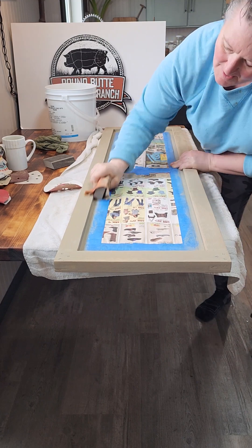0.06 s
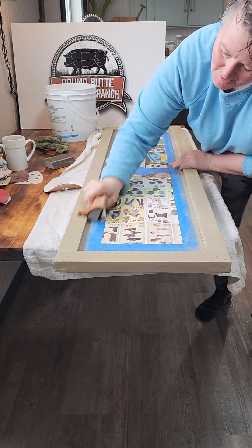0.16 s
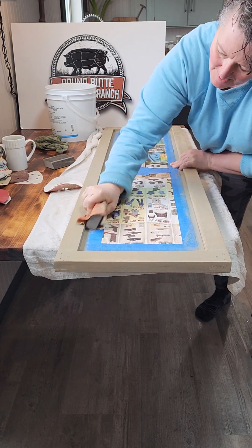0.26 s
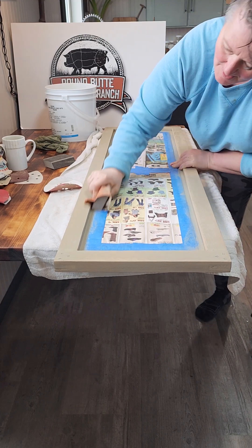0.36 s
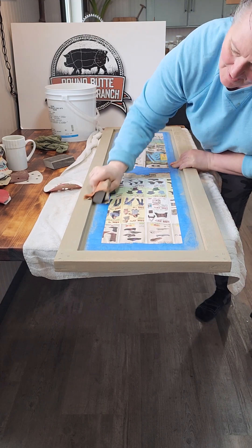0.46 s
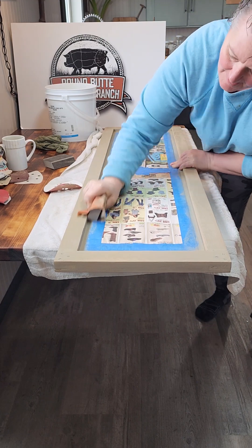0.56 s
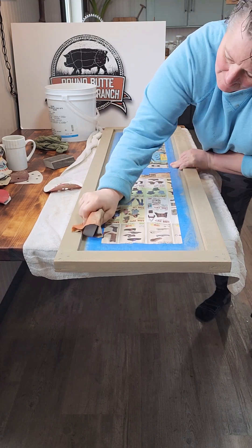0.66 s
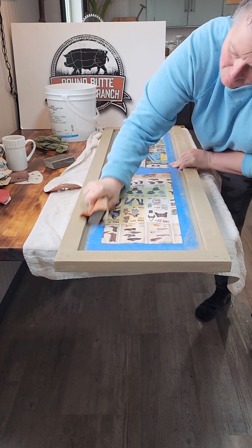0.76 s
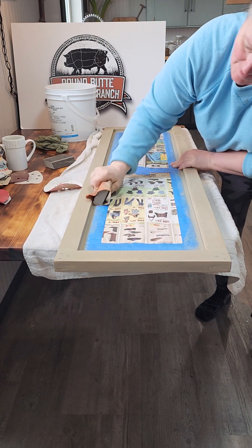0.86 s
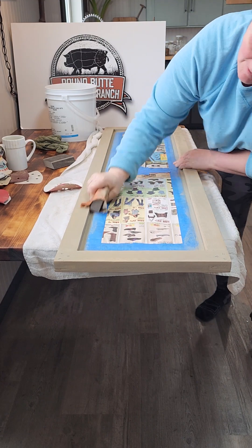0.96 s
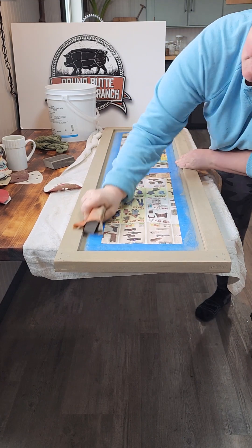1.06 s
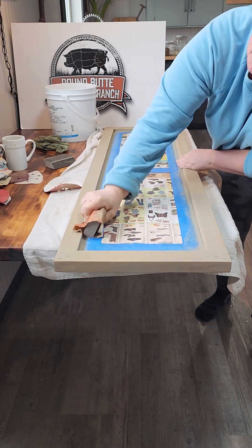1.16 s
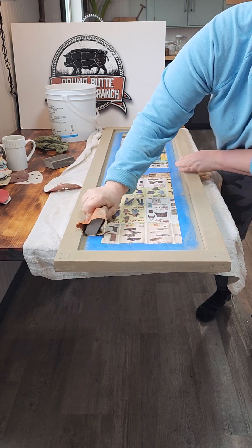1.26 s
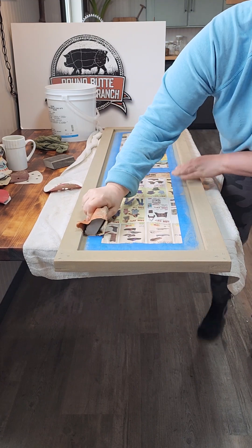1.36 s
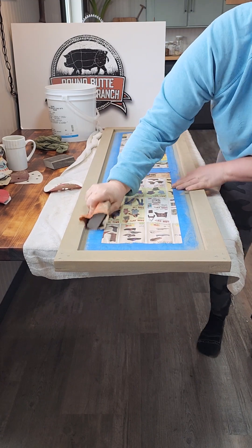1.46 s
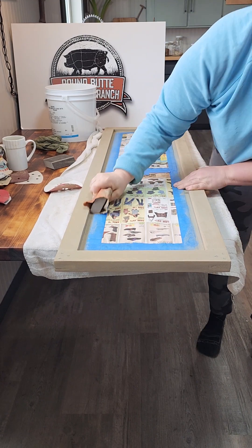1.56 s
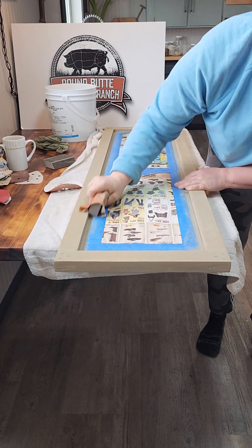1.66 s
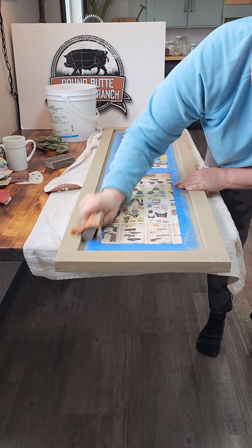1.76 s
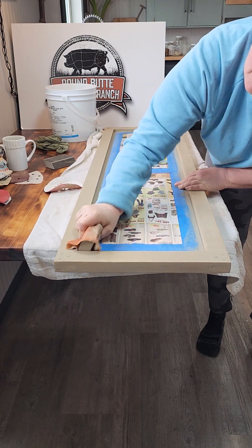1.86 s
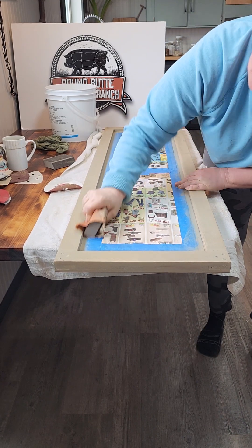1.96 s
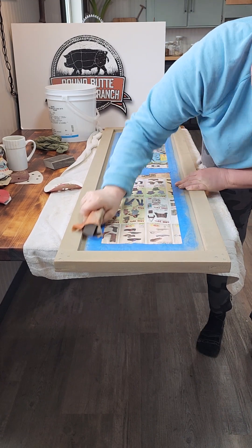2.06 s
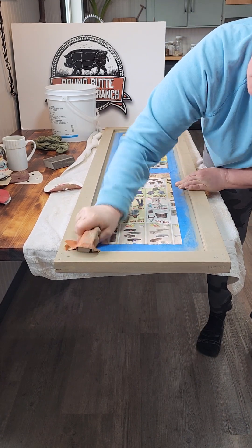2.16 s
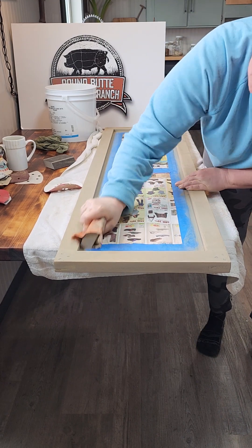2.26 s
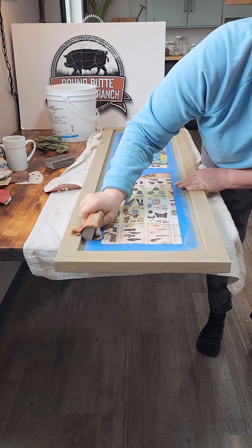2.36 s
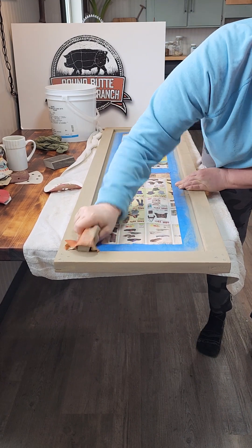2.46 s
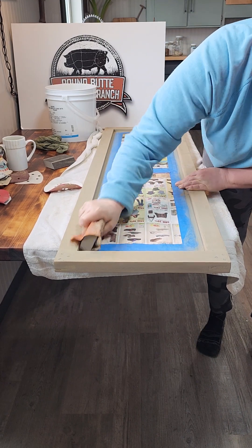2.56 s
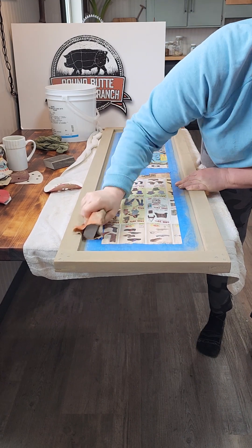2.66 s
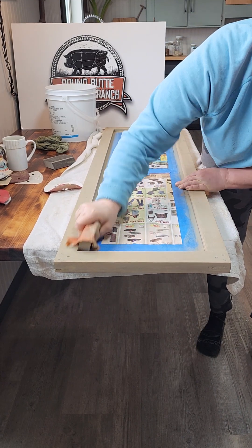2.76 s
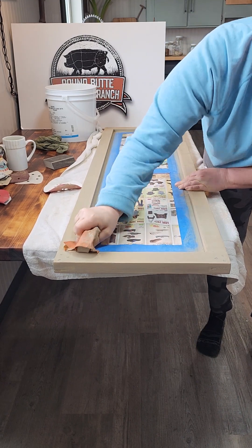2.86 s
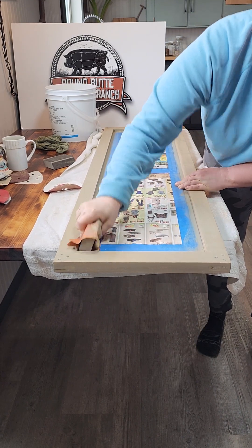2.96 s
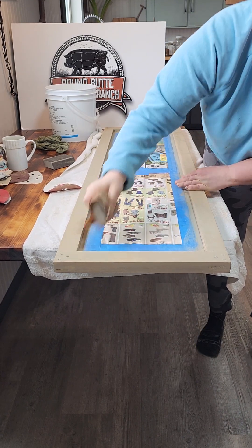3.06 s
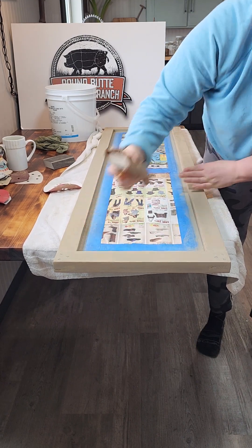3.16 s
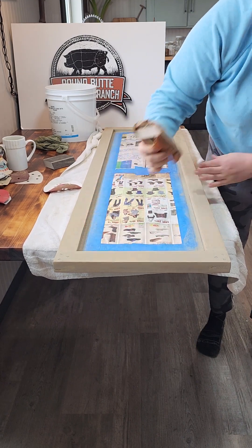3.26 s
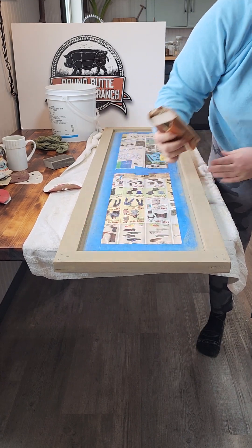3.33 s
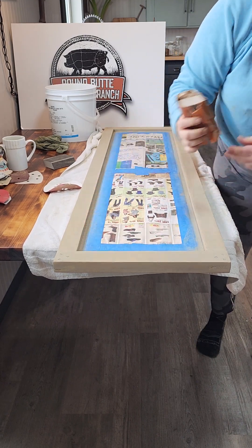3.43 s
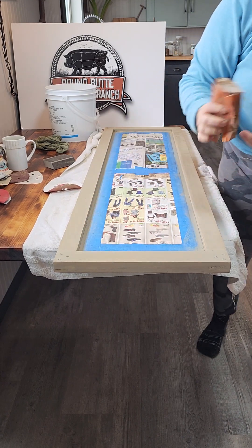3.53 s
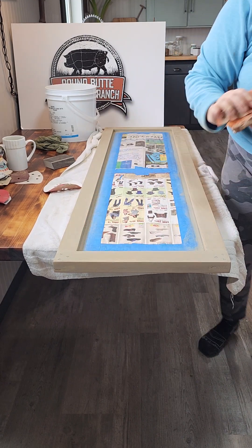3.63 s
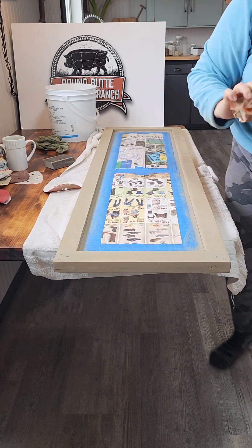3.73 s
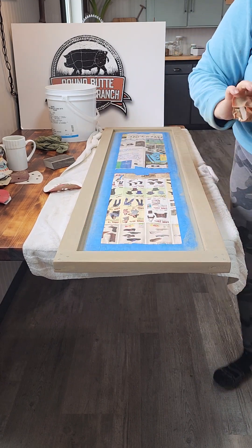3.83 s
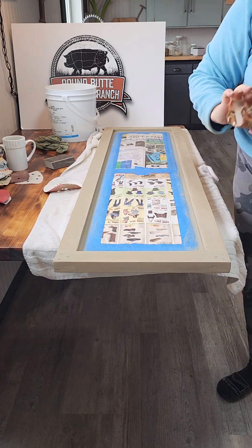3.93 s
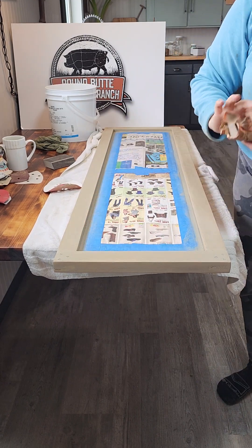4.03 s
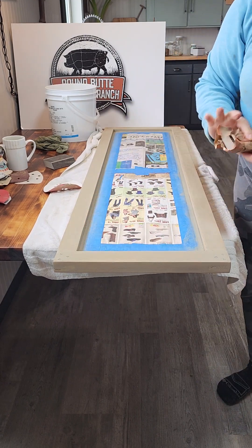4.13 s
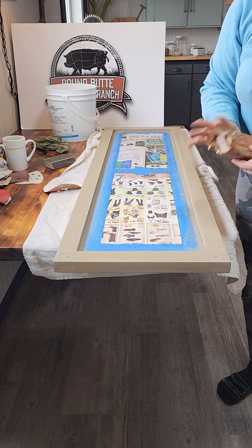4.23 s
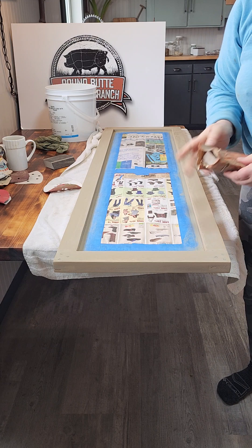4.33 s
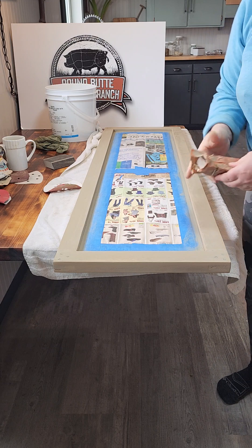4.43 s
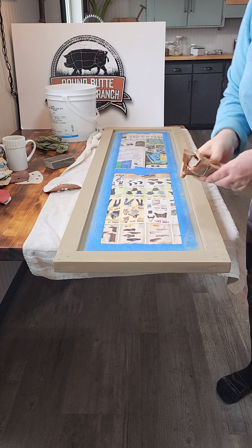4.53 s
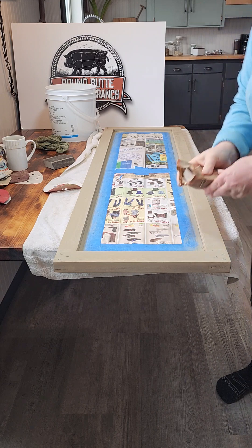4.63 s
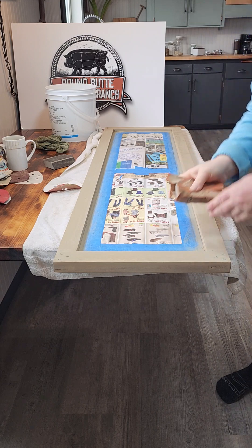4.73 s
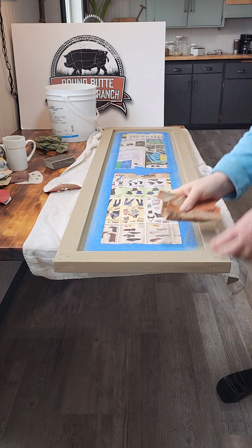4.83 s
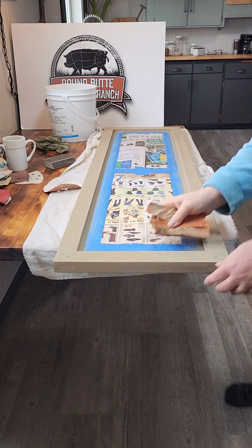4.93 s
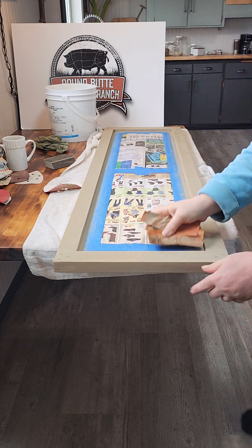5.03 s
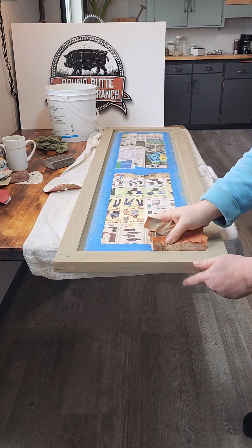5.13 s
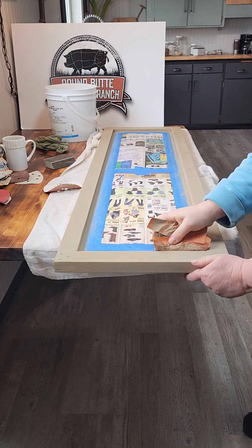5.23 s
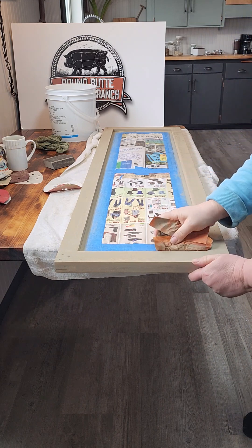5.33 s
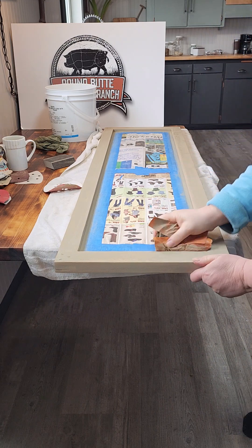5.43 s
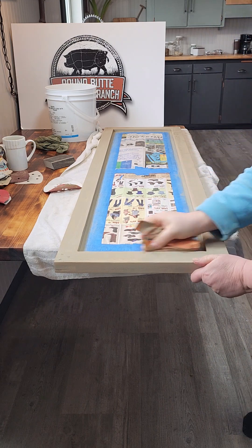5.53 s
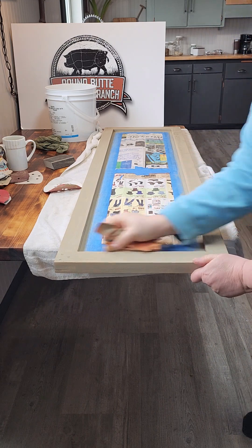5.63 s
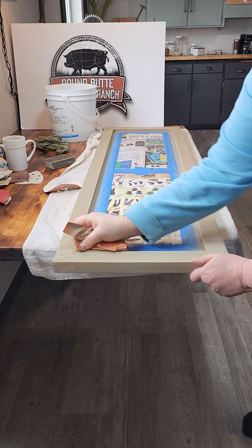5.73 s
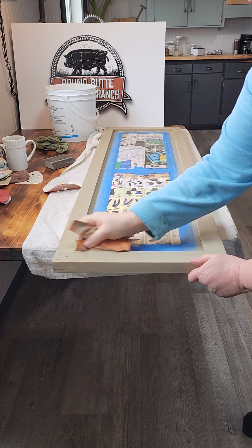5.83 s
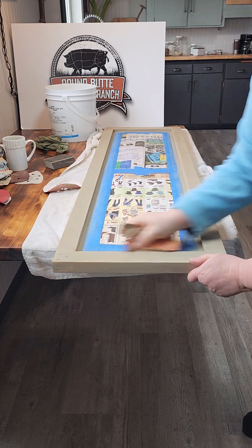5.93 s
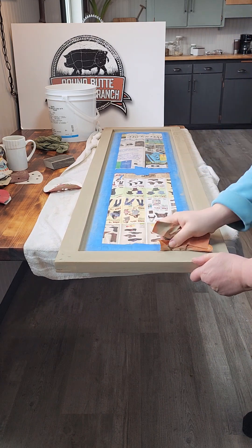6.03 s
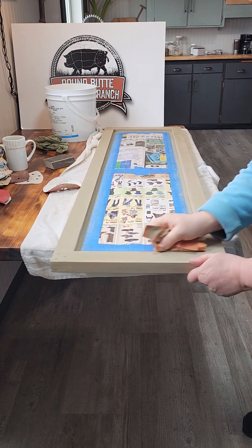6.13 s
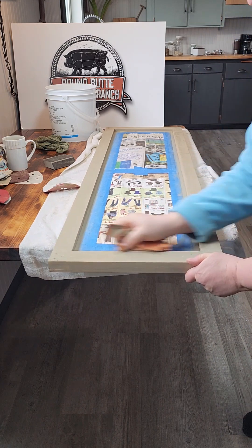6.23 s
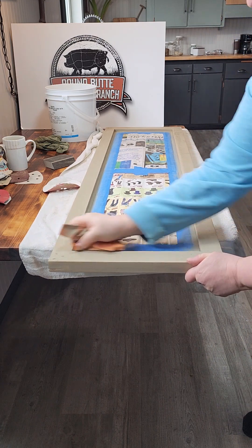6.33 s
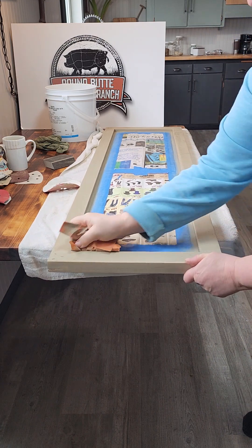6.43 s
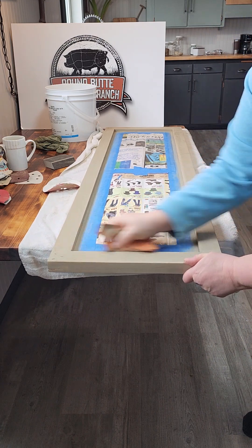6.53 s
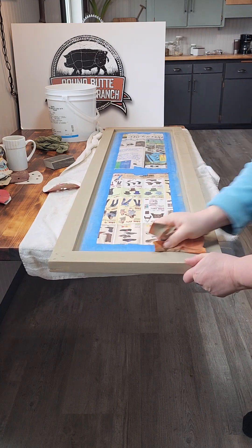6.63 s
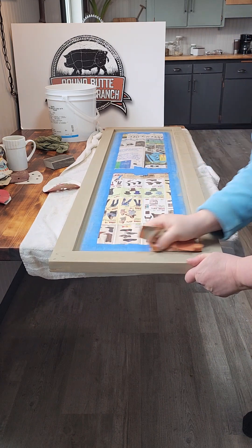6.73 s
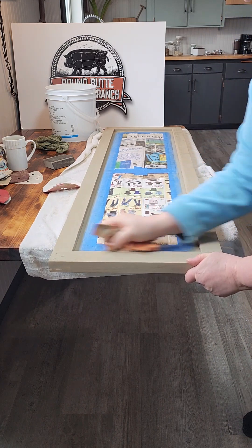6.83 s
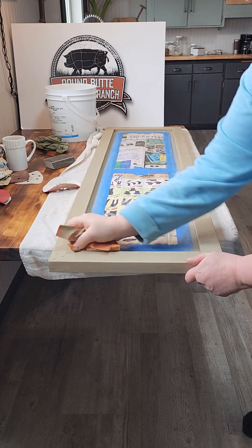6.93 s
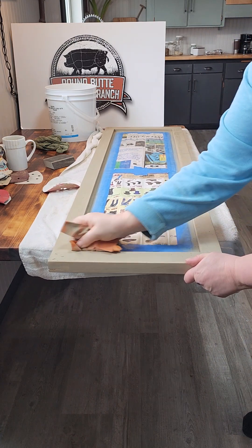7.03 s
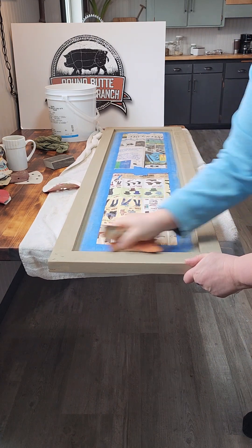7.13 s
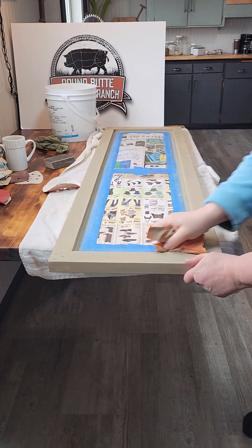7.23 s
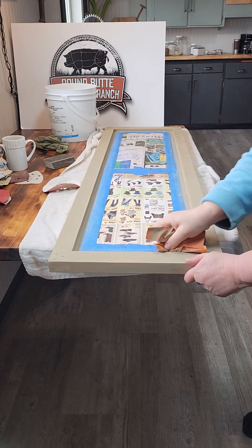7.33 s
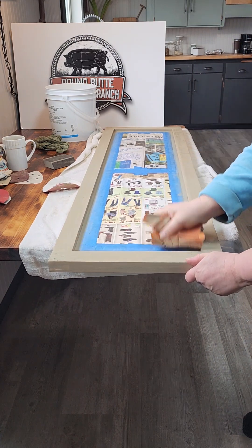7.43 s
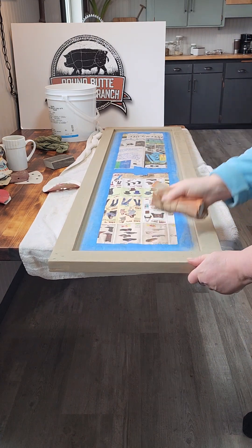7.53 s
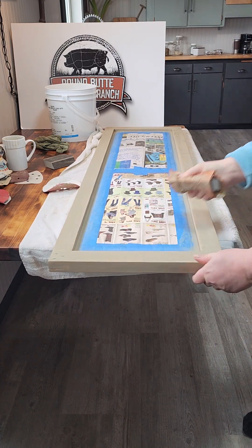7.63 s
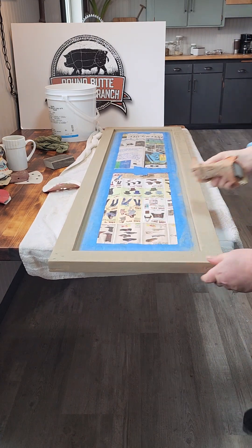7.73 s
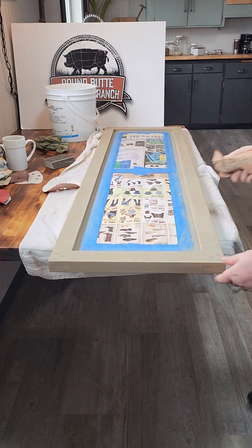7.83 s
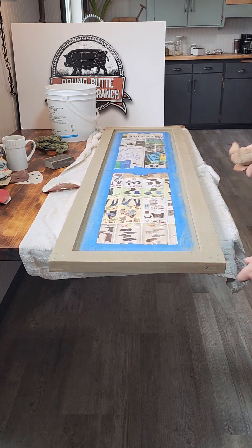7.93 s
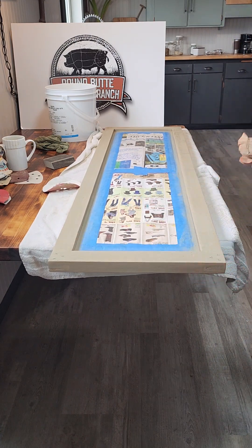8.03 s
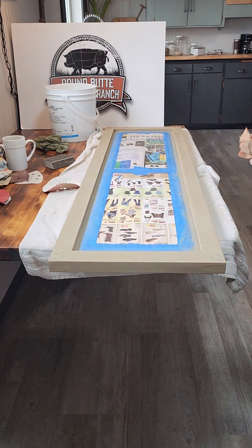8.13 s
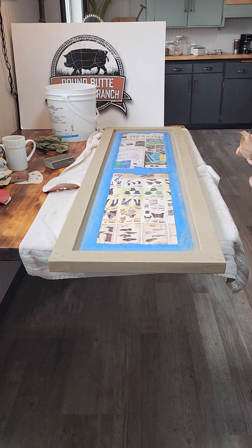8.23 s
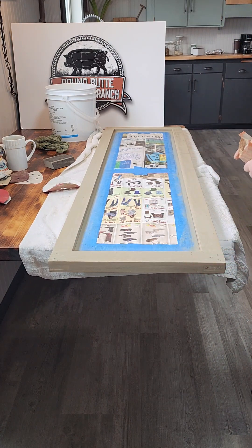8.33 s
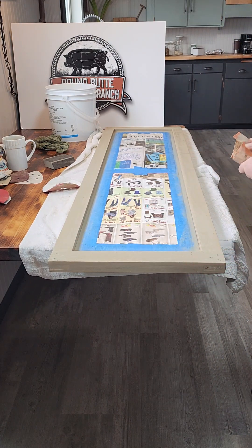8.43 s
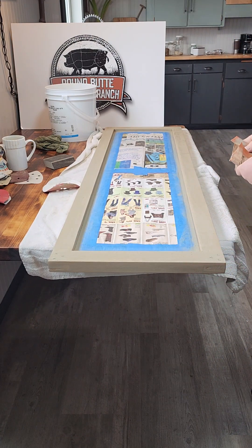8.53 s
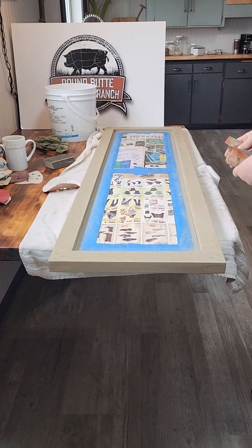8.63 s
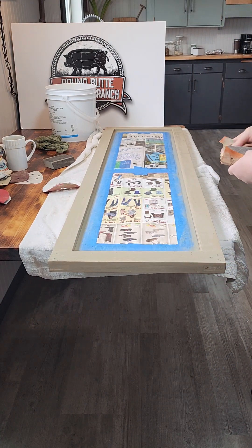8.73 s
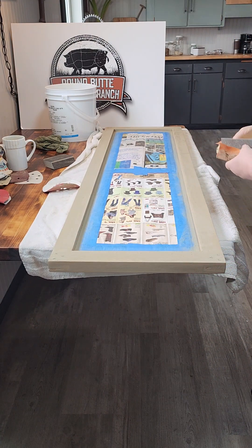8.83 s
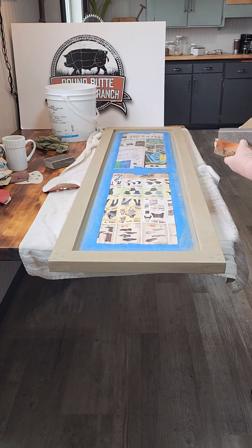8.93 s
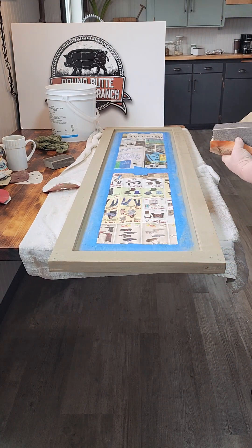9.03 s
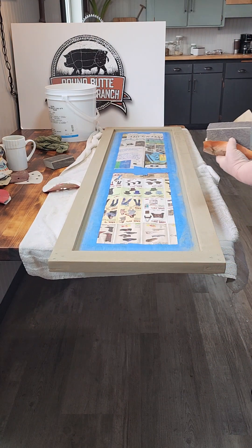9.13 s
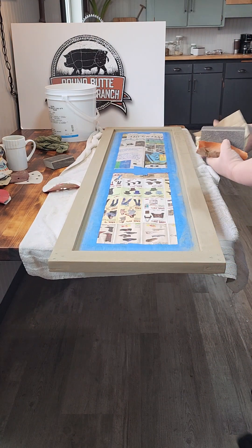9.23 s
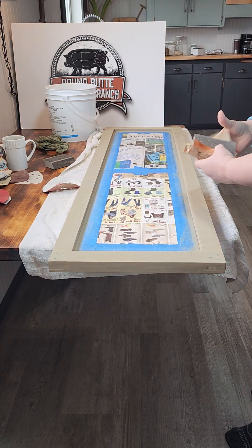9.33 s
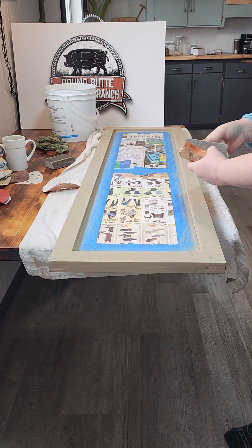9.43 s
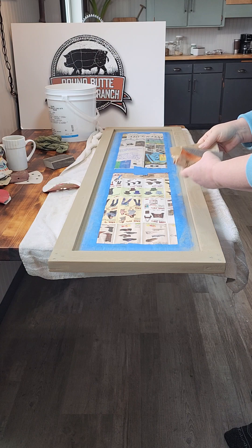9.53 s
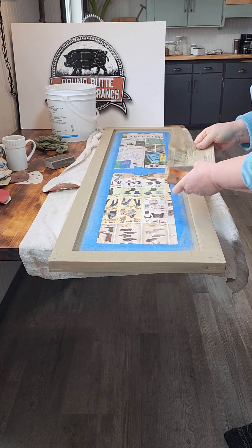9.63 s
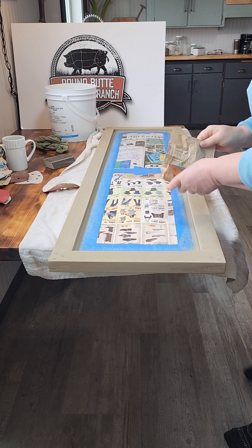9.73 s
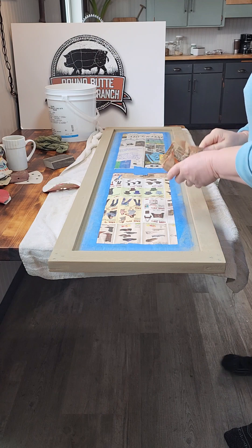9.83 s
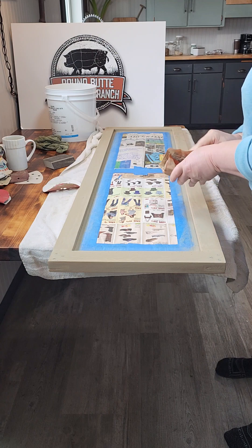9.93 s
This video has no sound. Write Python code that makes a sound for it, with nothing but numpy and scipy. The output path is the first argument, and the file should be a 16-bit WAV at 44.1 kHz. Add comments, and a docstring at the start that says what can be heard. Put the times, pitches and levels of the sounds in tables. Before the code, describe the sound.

Bright, dry gritty scratching swishes in steady strokes, each turn giving a soft wooden knock. After about three seconds it gives way to paper handling, little ticks and muffled steps over faint room noise. Sanding returns for six broader strokes with deeper thumps, then ends in sparse rustles. A small room, heard close in stereo with a short, light reverberation.

```python
"""Sanding a painted door

A sanding block is rubbed back and forth over a painted wooden door on a table, in a quiet room.
Tiny random slips make the grit scratch and the door hiss; ringing wood modes make the knocks and rocking.
In the pauses the hands rustle and tick the paper, feet step softly and the table creaks once.
A small microphone pair close by hears it over room noise, with a faint hum that comes and goes."""
import sys
import numpy as np
from scipy import signal
from scipy.fft import rfft, irfft, next_fast_len
from scipy.io import wavfile
from scipy.ndimage import uniform_filter1d, map_coordinates

SR = 44100
rng = np.random.default_rng(int(sys.argv[2]) if len(sys.argv) > 2 else 0)


def transcribe(signal):
    """Save signal, clipped to [-1, 1], as a 16-bit WAV file at the path in sys.argv[1]."""
    frames = np.atleast_2d(signal).T
    limited = np.clip(frames, -1, 1)
    pcm = np.round(limited * 32767).astype(np.int16)
    wavfile.write(sys.argv[1], SR, pcm)


N = 440559


def amp(db):
    """Turns decibels into a plain factor."""
    return 10 ** (np.asarray(db) / 20)


def unit(x):
    """Scales a sound to an average (RMS) strength of 1."""
    return x / np.sqrt(np.mean(x ** 2) + 1e-20)


def seconds():
    """The time of every sample."""
    return np.arange(N) / SR


def along(points, hz):
    """Reads a curve of (Hz, value) points on a log frequency axis."""
    f, v = np.transpose(points)
    return np.interp(np.log(hz + 1), np.log(f + 1), v)


def curves(rows):
    """Gives one value per sample for each column after the time."""
    s, *columns = np.transpose(rows)
    return [np.interp(seconds(), s, column) for column in columns]


def wobble(rate):
    """A smooth random curve with this many random points a second."""
    points = rng.standard_normal(int(N * rate / SR) + 4)
    return map_coordinates(points, [np.arange(N) * rate / SR])


def filtered(x, response):
    """Changes the strength and timing of each frequency in x by a response."""
    m = next_fast_len(N + SR // 2)
    return irfft(rfft(x, m) * response(np.fft.rfftfreq(m, 1 / SR)), m)[..., :N]


def scratches(per_s, spread_db, patchy_db):
    """Two streams of tiny slips of uneven size, with patches of louder and softer colour."""
    happens = rng.random((2, N)) < per_s / SR
    slips = happens * rng.standard_normal((2, N)) * amp(spread_db * rng.exponential(size=(2, N)))
    z = signal.stft(slips, nperseg=256)[2]
    # smooth the random patches over frequency, then over time
    over_frequency = uniform_filter1d(rng.standard_normal(z.shape[1:]), 4, 0)
    patches = uniform_filter1d(over_frequency, 12, 1)
    return signal.istft(z * amp(patchy_db * unit(patches)), nperseg=256)[1][:, :N]


# How a near sound leans to one side.
# Each row: frequency in Hz, left over right in dB.
LEAN_TO_LEFT = [(60, 2), (130, -3), (290, -13), (640, 3.5), (1410, 0), (3100, -1), (6820, -5), (15000, 3)]


def heard(pair, spectrum, alike, lead=None):
    """Colours two streams and mixes them to left and right; a near source leans and leads by frequency."""
    def turn(hz):
        return np.arccos(np.clip(along(alike, hz), -1, 1)) / 2

    def mid_and_side(hz):
        return amp(along(spectrum, hz)) * [np.cos(turn(hz)), np.sin(turn(hz))]

    def half(hz):
        # each ear gets half of the lean and half of the lead
        return amp(along(LEAN_TO_LEFT, hz) / 2) * np.exp(.5j * lead(hz))

    mid, side = filtered(pair, mid_and_side)
    both = np.array([mid + side, mid - side])
    if lead:
        both = filtered(both, lambda hz: [half(hz), 1 / half(hz)])
    return unit(both)


def modes(table):
    """Adds up (Hz, width in Hz, dB) resonances: each answers most near its own pitch."""
    def response(f):
        total = 0
        for k, (center, width, db) in enumerate(table):
            peak = 1j * f * width / (center * center - f * f + 1j * f * width)
            total = total + (-1) ** k * amp(db) * peak  # signs alternate
        return total
    return response


# The ways the table legs (below 100 Hz), table top (100-400 Hz) and door (above 400 Hz) like to ring.
# Each row: pitch in Hz, relative level in dB, seconds to fade by 60 dB (before any damping).
WOOD_MODES = [ (27, -12.5, 0.068), (38.2, 2.5, 0.41), (46.65, 1, .3), (61.6, -4.5, .22), (77.3, -4.5, .2),
              (160, -7, .09), (192, -1, .22), (222, -3, .06), (245, -2.5, .07), (313, -10, .1),
              (530, -8, 0.027), (644, -11, 0.059), (799, 2, 0.048), (1005, -5, 0.084), (1295, -1.5, 0.057),
              (1769, -6, 0.078), (2057, -10, 0.1), (2880, -5.5, 0.029), ]


def wood_modes(low_hz, high_hz):
    """The wood's modes within a range: the faster one fades, the wider its resonance."""
    return modes([(hz, np.log(1000) / (np.pi * t60), db) for hz, db, t60 in WOOD_MODES if low_hz < hz < high_hz])


# The colour of the room noise.
# Each row: frequency in Hz, relative level in dB per Hz.
AIR_COLOUR = [(18, -39.5), (30, -8.5), (70, -1), (486, -21.5), (721, -21), (3060, -18.5), (3490, -22),
              (6380, -11), (9710, -27.5), (14000, -26.5), (16000, -43.5)]
# The hum comes and goes.
# Each row: time in seconds, hum level in dB.
HUM_LEVEL = [(2.9, -84.5), (3.3, -57), (3.53, -77), (3.74, -63.5), (4.25, -67.5), (4.4, -77), (4.75, -70),
             (5.1, -88)]


def background():
    """Coloured noise fills the room; a low sine with a slightly drifting phase hums."""
    hum = amp(curves(HUM_LEVEL)[0]) * np.sin(2 * np.pi * 150.5 * seconds() + .3 * wobble(3.5))
    alike = [(60, 0.8), (300, .6), (900, 0.097)]  # Hz, left-right likeness
    return amp(-68.0) * heard(rng.standard_normal((2, N)), AIR_COLOUR, alike) + hum


# How long the room rings.
# Each row: frequency in Hz, seconds to fade by 60 dB.
ROOM_FADE = [(200, 0.57), (2000, 0.25), (10000, 0.23)]


def room(x):
    """Each frequency of the room's answer dies at its own speed."""
    hz, t, z = signal.stft(rng.standard_normal((2, SR // 2)), SR, nperseg=256)
    fading = z * amp(-60 * t / along(ROOM_FADE, hz)[:, None])
    tail = signal.istft(fading, SR, nperseg=256)[1]
    late = np.pad(tail, ((0, 0), (300, N - 300 - tail.shape[1])))  # 300 samples late
    # the answer is weak below about 600 Hz
    tail = filtered(late, lambda f: f * f / (f * f + 600 ** 2))[:, :SR // 2]
    return signal.fftconvolve(x, tail / np.linalg.norm(tail[0]), axes=1)[:, :N]


# Soft footfalls.
# Each row: start in seconds, level in dB.
FOOTFALLS = [(4.264, -39), (4.826, -28.5), (4.939, -38)]


def steps():
    """A foot in a sock makes the floorboards boom once: a low sine swells fast and fades."""
    out = np.zeros(N)
    for start, db in FOOTFALLS:
        since = np.clip(seconds() - start, 0, None)
        swell = 1 - np.exp(-since / 0.0097)
        out += amp(db - 60 * since / 0.25) * swell * np.sin(2 * np.pi * 79.0 * since)
    return out


def creak():
    """One short low creak as the weight leaves the table."""
    t = seconds()
    return amp(-57) * np.exp(-((t - 3.4) / 0.016) ** 4) * np.sin(2 * np.pi * 328 * t)


# How hard the table is pushed about.
# Each row: time in seconds, level of the legs in dB, level of the table top in dB.
TABLE_ROCKING = [(0, -45, -46), (.37, -39.5, -52.5), (.67, -47, -56.5), (1.25, -45, -52), (1.5, -53, -64),
                 (1.62, -48.5, -57), (2.24, -43, -53.5), (3.05, -41.5, -54.5), (3.4, -61, -77.5),
                 (4.2, -65.5, -77.5), (5, -69.5, -68), (5.55, -57.5, -64), (5.98, -43.5, -59.5),
                 (7.31, -39, -56.5), (7.67, -55.5, -78), (8.4, -71, -80), (8.55, -79, -80),
                 (9.99, -72, -69.5)]


def table():
    """Uneven pushes keep the table legs and top moving between jolts."""
    legs_db, top_db = curves(TABLE_ROCKING)
    uneven_db = np.array([[4.5 * wobble(9)], [5.6 * wobble(16)]])  # legs, top
    pushes = rng.standard_normal((2, 2, N)) * amp(uneven_db)
    legs = unit(filtered(pushes[0], wood_modes(10, 100)))
    top = unit(filtered(pushes[1], wood_modes(100, 400)))
    mid, side = amp(legs_db) * legs + amp(top_db) * top
    return mid + amp(-19.5) * np.array([side, -side])


# The colour of sliding and snapping paper.
# Each row: frequency in Hz, relative level in dB per Hz.
PAPER_COLOUR = [(1180, -27), (2000, -5), (2320, -10.5), (2810, -10), (3770, 0.5), (4860, -0.5), (5350, -2),
                (6310, 1.5), (9660, -12), (11600, -3.5), (12400, -4.5), (15200, -9), (16000, -24.5)]
# Paper snaps and touches.
# Each row: start in seconds, level at the start in dB, seconds to fade by 60 dB.
PAPER_TICKS = [(0.267, -14.5, 0.01), (1.52, -43, 0.012), (4.9296, -44, 0.026), (5.201, -40.5, .06),
               (5.3567, -39, 0.015), (5.453, -47, 0.013), (5.527, -45, .05), (7.823, -50, 0.024),
               (8.285, -48, .08), (8.7552, -37.5, 0.028)]


def ticks():
    """Paper snaps and touches are short bursts of noise with a sudden start."""
    t, shape = seconds(), np.zeros(N)
    for start, db, t60 in PAPER_TICKS:
        shape += amp(db - 60 * np.abs(t - start) / t60) * (t >= start)
    return shape * heard(rng.standard_normal((2, N)), PAPER_COLOUR, SANDING_ALIKE)


# The colour of the low rub under the rustle.
# Each row: frequency in Hz, relative level in dB per Hz.
RUB_COLOUR = [(240, -33.5), (400, -20.5), (563, -6), (663, -11), (780, 1.5), (1170, -7), (1510, -0.5),
              (1770, -4.5), (2800, -5.5), (3640, -24), (6160, -120)]
# The hands fold and shift the paper.
# Each row: start of the hold in seconds, hold in seconds, rustle in dB, low rub in dB over the rustle.
PAPER_RUSTLES = [(1.371, .01, -48, 2), (3.164, 0.061, -50, -27), (3.292, 0.045, -51, -15),
                 (3.485, 0.0053, -60, -17), (3.72, .005, -60.5, -13), (3.792, .06, -63.5, -16),
                 (3.969, .03, -55, -29), (4.066, .005, -45, -9), (4.138, .005, -45, -7),
                 (4.235, 0.081, -48, -4), (4.279, 0.083, -42.5, -10.5), (4.555, .005, -60.5, -5),
                 (4.619, 0.0055, -52, -13), (4.685, .005, -49, -7), (4.738, 0.032, -49.5, -9.5),
                 (4.947, 0.0046, -53, -6), (4.991, .005, -50.5, -12), (5.05, 0.11, -54.5, -21),
                 (5.21, 0.0042, -47.5, -1), (5.26, .005, -40, 0), (5.303, 0.076, -48.5, 1.5),
                 (7.423, 0.0042, -40, -7), (7.511, 0.044, -40.5, -4.5), (7.914, .005, -59, -24),
                 (8.3, .03, -51.5, -8), (8.455, .01, -49, -3.5), (8.54, 0.031, -52.5, -2.5),
                 (8.681, 0.1, -50.5, -2.5), (8.977, 0.0053, -54, -16), (9.297, 0.0041, -56, -9),
                 (9.405, 0.0045, -56.5, -11), (9.6, .005, -56.5, 2), (9.68, 0.022, -51, -4),
                 (9.742, 0.029, -55, 0.5), (9.985, .005, -57, -1)]
# The faint stir of paper held in the hand.
# Each row: time in seconds, middle level in dB, around which it wobbles.
HELD_PAPER = [(1.4, -57), (1.5, -56), (3.25, -55), (3.39, -65), (3.58, -76.5), (3.66, -67), (3.9, -74),
              (4.2, -56.5), (4.5, -64.5), (4.82, -62.5), (5.45, -54.5), (7.66, -51), (7.81, -66),
              (8.4, -64.5), (8.83, -61.5), (8.92, -66.5), (9.5, -60.5), (9.87, -68.5)]
RISE_DB_PER_S, FALL_DB_PER_S = 450, 282  # every rustle comes faster than it goes
HELD_RUB_DB = -6.5  # over the held rustle
HELD_UNEVEN_DB, HELD_STIRS_PER_S = 1.5, 25
HANDS_LEAD_S = 6 / 44100  # the left side hears the hands this much earlier


def hands():
    """Fingers slide over the paper, off to one side: uneven slips that reach the left first."""
    t = seconds()
    rustle = amp(curves(HELD_PAPER)[0] + HELD_UNEVEN_DB * wobble(HELD_STIRS_PER_S))
    rub = amp(HELD_RUB_DB) * rustle
    for start, hold, db, rub_db in PAPER_RUSTLES:
        rise_db = RISE_DB_PER_S * np.clip(start - t, 0, None)
        fall_db = FALL_DB_PER_S * np.clip(t - start - hold, 0, None)
        swell = amp(db - rise_db - fall_db)
        rustle, rub = np.hypot(rustle, swell), np.hypot(rub, amp(rub_db) * swell)
    slips = scratches(per_s=12000, spread_db=-1.0, patchy_db=1.3) * amp(1.5 * wobble(60))
    ring = modes([(570, 60, -4), (800, 70, 0), (1300, 120, 0), (2100, 300, -2)])
    ringing = filtered(slips, lambda f: 1 + 0.5 * ring(f))
    alike = [(300, 0.53), (1000, 0.18), (10000, 0.37)]  # Hz, left-right likeness
    lead = lambda hz: 2 * np.pi * hz * HANDS_LEAD_S
    return rustle * heard(slips, PAPER_COLOUR, alike, lead) + rub * heard(ringing, RUB_COLOUR, alike, lead)


# The block and hands jolt the wood.
# Each row: start in seconds, boom in dB, thud in dB over the boom, rap in dB over the boom.
WOOD_KNOCKS = [(0.202, -27.5, -33, -12), (0.266, -32, 15.5, 14), (0.279, -24, 11.5, 2.5),
               (0.625, -28, -37, -14), (0.817, -33.5, -1, -14), (1.081, -31, -27, -11.5),
               (1.262, -33, -4, -11.5), (2.004, -23.5, -3, -20.5), (2.299, -28.5, 0, -11),
               (2.348, -22, -14, -31), (2.551, -27.5, -15, -21.5), (2.648, -25.5, -14, -24.5),
               (2.851, -35, -10, -9), (2.937, -26, -10, -15), (3, -23.5, -15, -32),
               (4.218, -44.5, 3.5, -16), (4.823, -33, -10, -33), (4.93, -38.5, 2.5, -2.5),
               (5.203, -37.5, -10, -5.5), (5.855, -27.5, -9.5, -16), (5.931, -36.5, -3, -8),
               (6.138, -27, -7, -13), (6.331, -43, -17, -14.5), (6.51, -23.5, -15.5, -33),
               (6.766, -29, -2.5, -14), (7.076, -26.5, -8.5, -16), (7.358, -26.5, -6, -11),
               (9.696, -53.5, 0, -5), (9.741, -50.5, 1.5, 6.5), (9.969, -58, 0, 3)]


def knocks():
    """Each jolt booms the legs, thuds the table top and raps the door, whose ring the hand damps."""
    out, t = np.zeros(N + SR), np.arange(SR // 2) / SR
    hz, level_db, t60 = np.transpose(WOOD_MODES)[:, :, None]
    damped_t60 = t60 * np.where(hz > 400, .6, np.where(hz > 100, .7, .9))
    # heavy parts take about a cycle to get moving
    swell = 1 - np.exp(-(t * hz / np.where(hz > 400, .2, .85)) ** 2)
    for start, db, thud_db, rap_db in WOOD_KNOCKS:
        share_db = np.where(hz < 100, 0, np.where(hz < 400, thud_db, rap_db))
        share_db = share_db + rng.normal(0, 3.3, hz.shape)  # every knock excites the modes differently
        fade = amp(level_db + share_db - 60 * t / damped_t60)
        ring = fade * np.sin(2 * np.pi * hz * t) * swell
        out[round(start * SR):][:len(t)] += amp(db) * ring.sum(axis=0)
    return out[:N]


# The colours of the grit on paint and of the hissing door.
# Each row: frequency in Hz, relative level in dB per Hz.
GRIT_COLOUR = [(1180, -32.5), (2000, -22), (2440, -13.5), (2980, -6), (3910, -4), (4690, -1), (5030, -3),
               (6420, 0), (6820, -2.5), (7380, -3), (9410, -14), (9920, -14.5), (12100, -7), (15100, -13),
               (16000, -22.5)]
DOOR_COLOUR = [(240, -55.5), (400, -30), (586, -19), (647, -9), (713, -16), (786, -13.5), (1160, -8),
               (2070, -1.5), (2440, -6.5), (2800, -7.5), (3640, -17.5), (6160, -120)]
# How alike the two sides are.
# Each row: frequency in Hz, left-right likeness (1 is the same).
SANDING_ALIKE = [(180, 1), (550, 0.49), (1650, 0.5), (5000, 0.36), (15000, 0.49)]
# How far the left side is ahead.
# Each row: frequency in Hz, lead in radians.
SANDING_LEAD = [(300, 1.3), (3000, 0.4), (6000, 1.5), (7500, 1.63), (9200, 2.5), (12000, 1.1), (16000, 1.6)]
# One push or pull of the block each.
# Each row: start in seconds, end in seconds, grit in dB, door in dB over the grit,
# lateness of the fastest moment (above 1 is later than a plain sine arch).
SANDING_STROKES = [(-0.034, 0.15, -21, -14, 0.83), (0.158, 0.383, -19.5, -15, 1.54),
                   (0.397, 0.579, -23, -13.5, 1.01), (0.586, 0.812, -20.5, -14, 1.51),
                   (0.827, 1.027, -22.5, -14, 1.25), (1.038, 1.25, -21.5, -16, 1.54),
                   (1.199, 1.391, -41.5, -1.5, 0.97), (1.526, 1.731, -26.5, -10.5, 1.6),
                   (1.771, 1.993, -20, -12, 1.5), (2.016, 2.15, -23, -13, 1.08),
                   (2.175, 2.314, -21.5, -11.5, 1.7), (2.348, 2.475, -24, -11.5, 1.15),
                   (2.497, 2.626, -24, -11.5, 1.65), (2.665, 2.795, -24.5, -11, 1.18),
                   (2.82, 2.951, -25, -12.5, 1.53), (2.928, 3.172, -38.5, -7, 2.35),
                   (5.602, 5.883, -22, -9, 1.3), (5.946, 6.157, -20, -12.5, 1.54),
                   (6.244, 6.499, -21.5, -9, 1.43), (6.546, 6.787, -21, -11, 1.76),
                   (6.794, 7.082, -22.5, -9.5, 1.58), (7.135, 7.387, -22, -13, 1.54)]
# The block stays pressed on the door and creeps at the turns.
# Each row: start in seconds, end in seconds, level in dB.
BLOCK_CONTACT = [(0, 1.26, -42.5), (1.524, 2.98, -40.5), (5.529, 7.415, -40)]
PRESS_S = 0.019  # the hand takes this long to press the block down


def sanding():
    """Thousands of grit tips slip over the paint, louder with hand speed; the same slips shake the door."""
    t, grit, door = seconds(), np.zeros(N), np.zeros(N)
    for start, end, db, door_db, late in SANDING_STROKES:
        progress = np.clip((t - start) / (end - start), 0, 1)
        speed = np.abs(np.sin(np.pi * progress ** late))
        grit += amp(db) * speed ** 0.7
        door += amp(db + door_db) * speed ** 0.27  # the door answers more to pressure than to speed
    for start, end, db in BLOCK_CONTACT:
        creep = amp(db) * np.clip((t - start) / PRESS_S, 0, 1) * (t < end)
        grit, door = np.hypot(grit, creep), np.hypot(door, amp(-4.5) * creep)
    slips = scratches(per_s=30000, spread_db=0.9, patchy_db=1.47) * amp(0.16 * wobble(40))
    ringing = filtered(slips, lambda f: 1 + 0.27 * wood_modes(400, 4000)(f))
    lead = lambda hz: along(SANDING_LEAD, hz)
    scratching = grit * heard(slips, GRIT_COLOUR, SANDING_ALIKE, lead)
    hissing = door * heard(ringing, DOOR_COLOUR, SANDING_ALIKE, lead)
    return scratching + hissing


def scene():
    """Adds all sources; the sanding and the knocks also ring in the room."""
    rubbing, bumps = sanding(), knocks()
    near = rubbing + amp(-9.5) * room(rubbing) + bumps + amp(2.5) * room(bumps[None])
    return near + hands() + ticks() + table() + steps() + creak() + background()


TOP_HZ = 15830


def record(dry):
    """The recorder keeps nothing above its band limit."""
    return filtered(dry, lambda hz: hz < TOP_HZ)


dry = scene()
out = record(dry)
transcribe(out)
```